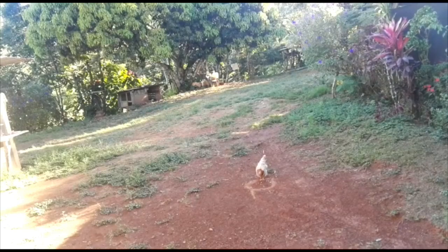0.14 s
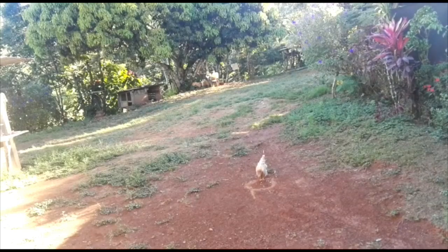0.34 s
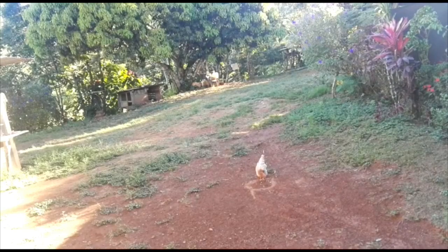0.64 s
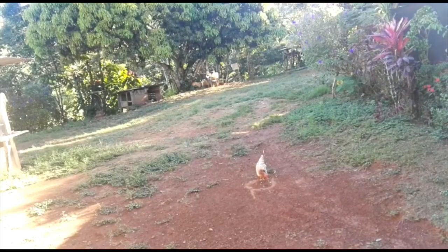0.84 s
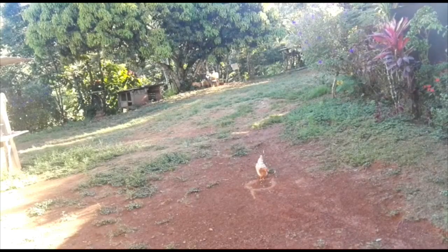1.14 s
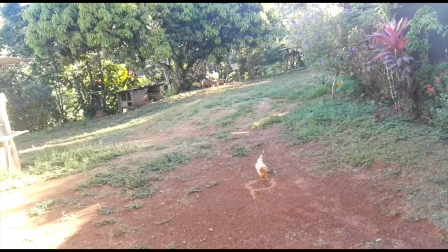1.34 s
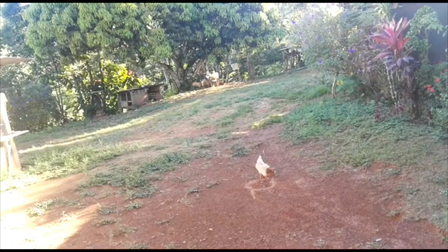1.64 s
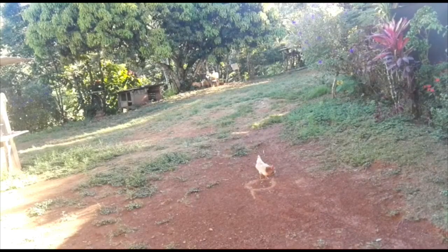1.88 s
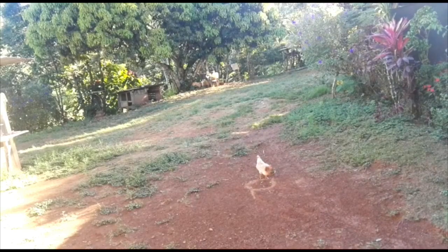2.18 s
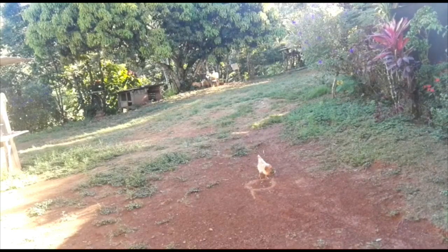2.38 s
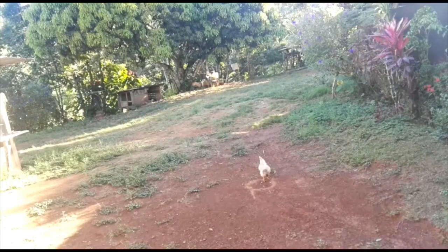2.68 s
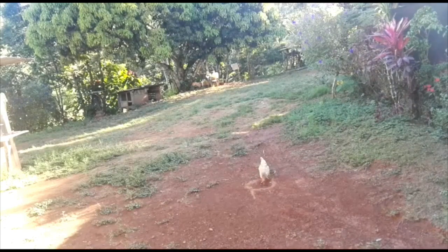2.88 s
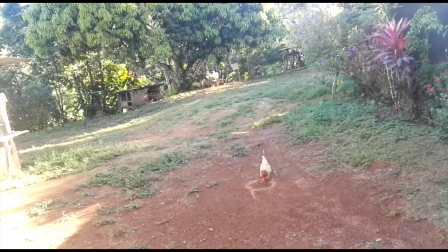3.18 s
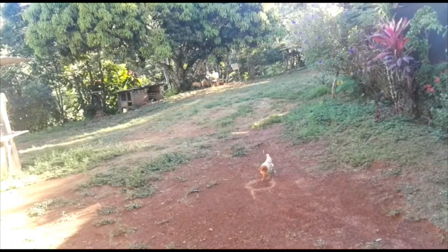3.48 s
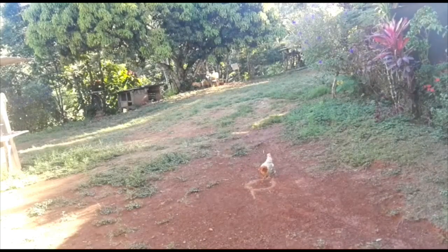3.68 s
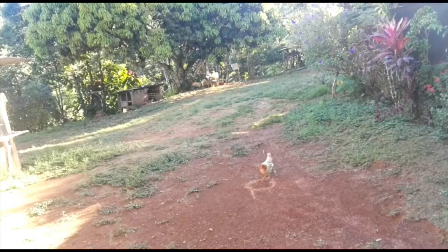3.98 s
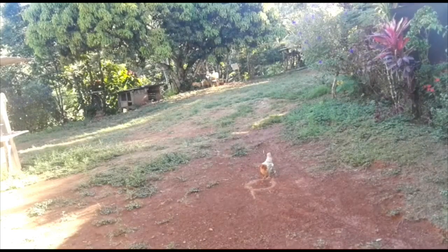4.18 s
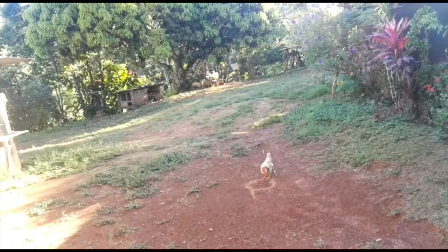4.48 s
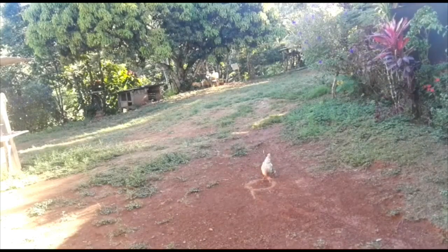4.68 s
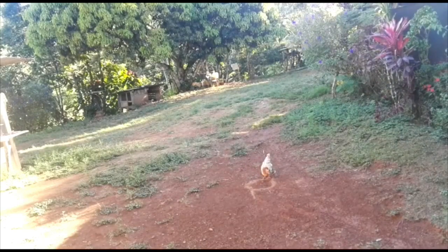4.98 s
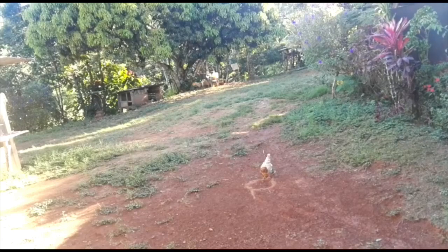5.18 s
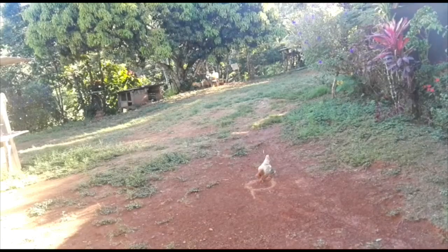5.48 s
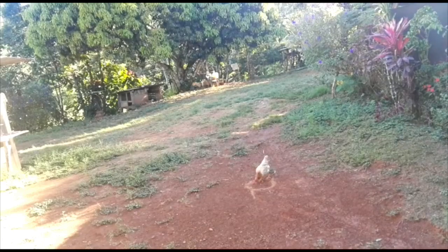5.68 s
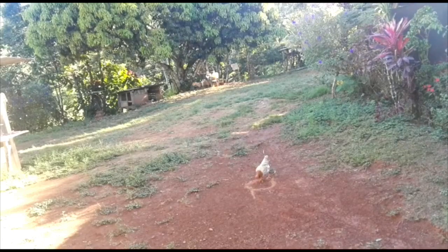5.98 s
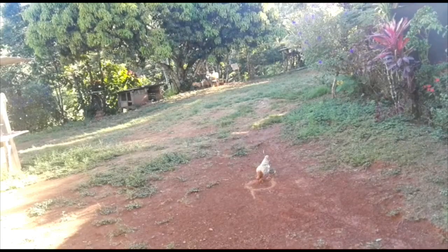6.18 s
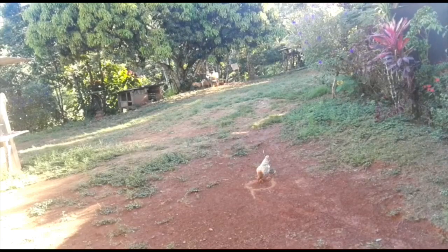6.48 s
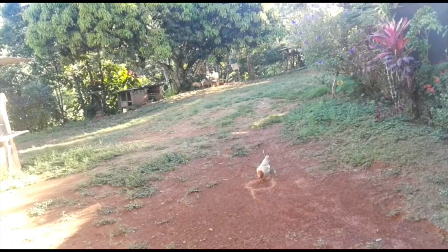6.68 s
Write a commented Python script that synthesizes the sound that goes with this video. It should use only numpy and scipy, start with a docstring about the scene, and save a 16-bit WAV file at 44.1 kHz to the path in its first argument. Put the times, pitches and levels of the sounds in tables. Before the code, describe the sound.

A quiet open yard with soft airy background and a thin, throbbing cicada shimmer, very high and slightly left. Tiny dry rustles come at the start. From about 0.55 to 1.4 s a chicken on the right gives a drawn-out squawk: a rough croak opening, a clear nasal tone slightly sinking in pitch, then a pulsing, creaky rasp. A short diffuse echo follows. Between calls a faint low wavering hum swells around 1.9 to 3.2 s; a second hen on the left clucks weakly near 2.0 and 2.3 s, then more plainly at 3.35 and 3.6 s, amid dull soft thumps. A far bird whistles downward near 2.7 s. From 4.3 to 5.05 s the first chicken repeats its long call, rasping at both ends. The distant whistle returns around 5.4 to 5.8 s, and a short gruff squawk comes at 5.85 s. Faint katydid ticks recur; insects and air continue to nearly 7 s.

```python
"""An open yard: a fowl to the right gives two drawn-out calls, clear in the middle and rasping at the ends,
then a short squawk. Pulses ringing a throat make the rasp, harmonic sines the clear voice.
A second hen clucks on the left in hoarse harmonic notes, and a far bird whistles in gliding sines.
Cicadas, a katydid, rustles, thumps and air are filtered noise; a low hum is wavering sines.
Decaying noise convolved with the birds gives the yard's echo."""
import sys
import numpy as np
from scipy import signal
from scipy.fft import rfft, irfft
from scipy.io import wavfile
from scipy.ndimage import uniform_filter1d

SR = 44100
rng = np.random.default_rng(int(sys.argv[2]) if len(sys.argv) > 2 else 0)


def gain_from_db(level_db):
    """Convert decibel levels to linear amplitude factors (20 dB per decade)."""
    decades = np.asarray(level_db, float) / 20
    return 10 ** decades


def waveform_to_disk(signal):
    """Save audio, clipped to [-1, 1], as 16-bit WAV at the path in sys.argv[1]."""
    frames = np.transpose(np.atleast_2d(signal))
    scaled = np.clip(frames, -1, 1) * 32767
    samples = np.round(scaled).astype(np.int16)
    wavfile.write(sys.argv[1], SR, samples)


N = 301644

PORT_LAG_S = 0.00061   # lag of the left port behind the right


def rms_one(x):
    """Normalisation to unit root-mean-square."""
    return x / np.sqrt(np.mean(x ** 2) + 1e-20)


def in_time(rows, t):
    """Linear interpolation in time: the columns of a table after its first, read at times t."""
    s, *columns = np.transpose(rows)
    return [np.interp(t, s, c) for c in columns]


def at_hz(points, hz):
    """Spectral interpolation: a level curve read on a log-frequency axis."""
    curve = np.array(points)
    return np.interp(np.log(hz), np.log(curve[:, 0]), curve[:, 1])


def add(out, x, s):
    """Superposition: mixes x into out from time s on."""
    i = max(round(s * SR), 0)
    out[..., i:i + x.shape[-1]] += x[..., :N - i]


def late(x, s):
    """Propagation delay of s seconds."""
    return np.interp(np.arange(N) - s * SR, np.arange(N), x, left=0)


def band(x, low_hz, high_hz, order=2):
    """Band-pass filtering."""
    return signal.sosfilt(signal.butter(order, [low_hz, high_hz], "band", fs=SR, output="sos"), x)


def drift(rate, count=N):
    """Random modulation of spread 1: chance knots, twice the rate per second, joined by straight lines."""
    knots = rng.standard_normal(int(count * 2 * rate / SR) + 3)
    steps = np.arange(count) * 2 * rate / SR
    return np.interp(steps, np.arange(len(knots)), knots) * np.sqrt(3 / 2)


def air(level_db=-67.5, patchy_db=.5):
    """Partial coherence: far wind and leaves are coloured noise, alike at both ports in the bass."""
    # Each row: frequency in Hz, spectral level in dB before the whole is scaled.
    colour = [(30, -12), (55, -10), (180, -13.5), (440, -14.5), (560, -13.5), (1400, -14), (2600, -19.5),
              (4350, -25.5), (6000, -30), (8200, -31.5), (10500, -29.5), (13500, -29.5)]
    # Each row: frequency in Hz, left-right likeness from 0 to 1.
    likeness = [(60, .998), (300, 0.98), (700, 0.11), (1500, .3), (4000, 0.11)]
    # Each row: frequency in Hz, left minus right in dB.
    balance = [(300, -0.5), (1500, -4.5), (8000, 2.5)]
    hz = np.fft.rfftfreq(N, 1 / SR) + 1
    shared, left, right = rfft(rng.standard_normal((3, N))) * gain_from_db(at_hz(colour, hz))
    sides = gain_from_db(np.outer([.5, -.5], at_hz(balance, hz)))
    alike = np.clip(at_hz(likeness, hz), 0, 1)
    own = np.sqrt(1 - alike) * np.array([left, right])
    lag = np.exp(-2j * np.pi * np.outer([PORT_LAG_S, 0], hz))   # the shared part comes later on the left
    out = irfft(sides * (own + np.sqrt(alike) * shared * lag), N)
    return gain_from_db(level_db + patchy_db * drift(2.015)) * rms_one(out)


def cicadas(throb_hz=38.3, depth=0.19, flicker_db=0.5):
    """Amplitude modulation: noise in narrow body resonances throbs with the muscle beat."""
    # Each row: time in seconds, level of the lower singers in dB before the side balance,
    # higher singer above them in dB.
    singers = [(0.0, -61, -20), (0.05, -64.5, -4.5), (0.8, -64.5, -1.5), (1.14, -73, -7.5), (1.33, -65, -8),
               (1.62, -62, 2), (2.36, -61.5, -3), (2.57, -68.5, -14), (2.88, -59, -5), (3.26, -66, -3),
               (3.89, -61, -8), (4.17, -64.5, -5), (5.87, -62, -7), (5.96, -65, -10.5), (6.63, -63, -1.5),
               (6.84, -64, -5)]
    t, out = np.arange(N) / SR, 0
    low_db, above_db = in_time(singers, t)
    resonances = [(6669, 124, low_db - 1.5), (6748, 170, low_db - 2.5),
                  (7073, 94, low_db + above_db), (13320, 500, low_db - 25.0)]
    for hz, width, db in resonances:
        beat = 2 * np.pi * np.cumsum(throb_hz * (1 + 0.037 * drift(2.3))) / SR
        noise = band(rng.standard_normal((2, N)), hz - width / 2, hz + width / 2)
        noise[1] += 0.11 * noise[0]   # each port hears its own blend
        throb = 1 + depth * np.sin(beat) + depth * 0.24 * np.sin(2 * beat)
        out = out + gain_from_db(db + flicker_db * drift(4.5)) * rms_one(noise) * throb
    return out * gain_from_db([[4.5], [-1.5]])   # left, right


def grainy_bursts(rows):
    """Shaped noise: grainy bands that swell to a peak at half their time scale, stronger on the left."""
    out, t = np.zeros((2, N)), np.arange(int(.4 * SR)) / SR
    for s, db, low_hz, high_hz, time_scale in rows:
        grains = rng.standard_normal((2, len(t))) * gain_from_db(2.0 * drift(150, len(t)))
        noise = band(grains, low_hz, high_hz)
        swell = t / time_scale * np.exp(2 - 2 * t / time_scale)
        add(out, gain_from_db(db) * rms_one(noise) * swell * gain_from_db([[3.0], [-3.0]]), s)
    return out


def rustles():
    """Friction noise: dry rustles near by, each a band of grainy noise."""
    # Each row: start in seconds, level in dB before envelope and side balance, lowest Hz, highest Hz,
    # time scale of the envelope in seconds.
    rustle_rows = [(.01, -64.5, 2900, 6000, 0.047), (.32, -65.5, 7500, 14700, 0.045),
                   (1.14, -79, 8770, 9600, 0.15), (2.258, -67, 2510, 4230, 0.042)]
    return grainy_bursts(rustle_rows)


def rasp(jitter=.3, spread_db=5.5, fourth_db=-12):
    """Source and filter: slow pulses ring the throat; rough ones come unevenly, drawn out into a puff of air."""
    # One table a call. Each row: time in seconds, mean pulses per second, level in dB,
    # beak brightness as 3rd resonance above the 1st in dB, roughness from 0 to 1.
    calls = [
        [(.555, 92.4, -63.5, -23.5, 0.38), (.6, 65, -36.5, -18, 0.69), (.65, 75, -27, -7.5, 0.75),
         (.72, 81.7, -46.5, -1.5, 0.86), (.93, 94, -57, 4.5, 0.99), (1.01, 98.4, -33, -6.5, 0.65),
         (1.1, 87.8, -35.5, 0, 0.26), (1.17, 92, -37.5, -3, .35), (1.24, 91, -36, -2.5, 0.18),
         (1.3, 93.5, -28.5, -7.5, 0.04), (1.38, 80, -34.5, -4.5, .12), (1.41, 82, -40, 1, 0.37)],
        [(4.295, 89, -68.5, -20, .7), (4.34, 63.7, -35.5, -17.5, 0.71), (4.39, 70.7, -28.5, -5.5, 0.59),
         (4.44, 76.7, -26, -13, 0.61), (4.49, 72.6, -34.5, -2.5, 0.82), (4.56, 83, -48.5, 2, .8),
         (4.7, 90, -52.5, -0.5, .9), (4.93, 94, -63, -1, 0.92), (4.99, 89.5, -37, -7.5, .6),
         (5.04, 80, -46.5, 4, .6)],
        [(5.8, 95, -70, -18.5, 0.97), (5.84, 74.3, -51.5, -21, .8), (5.865, 64.7, -40.5, -15.5, .7),
         (5.9, 78, -36, -6, .55), (5.94, 72.7, -40.5, -5.5, 0.48), (5.97, 69, -59, 4, 0.63)],
    ]
    # Throat resonances. Each row: frequency in Hz before the pitch ratio, width in Hz,
    # share of the throat's movement (exponent of the ratio).
    throat = [(585, 95, 1), (980, 250, 1), (1680, 150, .45), (2060, 240, .45)]
    # Every call opens alike. Each row: seconds after the start, throat pitch ratio before tension.
    opening = [(0, .64), (.025, 0.793), (.05, .92), (.09, 1.057), (.13, 1.1), (.19, 1.007), (.45, 0.945),
               (.75, 1.012)]
    # Throat pitch ratio of each call as a whole.
    tensions = [1.0, 1, 0.93]
    out, t = np.zeros(N), np.arange(1600) / SR
    for call, tension in zip(calls, tensions):
        s, pulses = call[0][0], np.zeros(N)
        while s < call[-1][0]:
            rate, db, third_db, rough = in_time(call, s)
            ratio = tension * in_time(opening, s - call[0][0])[0]
            second_db = 4 + .37 * third_db   # the 2nd resonance shares part of the beak's brightness
            rough = np.clip(rough, 0, 1)
            puff = rng.standard_normal(900) * np.exp(-t[:900] * rate / (1.1 + rough))
            push = np.sqrt(rough) * rms_one(puff) / np.sqrt(len(puff))
            push[0] = np.sqrt(1 - rough)
            ring = 0
            levels_db = (0, second_db, third_db, third_db + fourth_db)
            for (hz, width, share), level_db in zip(throat, levels_db):
                # every resonance swells before it dies, which keeps the valleys between them dark
                swell = t * np.exp(-np.pi * width * t)
                tone = rms_one(swell * np.sin(2 * np.pi * hz * ratio ** share * t))
                ring = ring + gain_from_db(level_db + rough * spread_db * rng.standard_normal()) * tone
            # little is radiated below the first resonance, wherever it lies
            ring = band(ring, .75 * ratio * throat[0][0], 2400, order=4)
            add(pulses, signal.fftconvolve(push, ring) * np.sqrt(SR / rate / len(t)), s)
            s += (1 + jitter * rough * np.clip(rng.standard_normal(), -2, 2)) / rate
        time = np.arange(N) / SR
        dying_db = 600 * np.maximum(time - call[-1][0], 0)   # the last pulse is choked
        out += pulses * gain_from_db(in_time(call, time)[1] - dying_db)
    return out


def clear_voice(waver=0.002, fade_s=.03, fourth_gains=.35):
    """Harmonic series: sines on multiples of the pitch; the odd ones drop out when both swings grow alike."""
    # One table a stretch. Each row: time in seconds, mean pitch in Hz, level in dB before the harmonics' own,
    # odd harmonics in dB, brightness in dB per octave.
    stretches = [
        [(.68, 288.5, -30.5, -8, 1), (.715, 288, -30.5, 4.5, -4.5), (.78, 282.1, -30, -5.5, 4),
         (.885, 278.8, -34, -2.5, 0.5), (.905, 276.5, -30.5, -28.5, -3), (.96, 273, -32.5, -26, 3.5)],
        [(1.13, 276, -34.5, -18.5, -1.5), (1.19, 278.2, -35.5, -17, -2)],
        [(4.37, 293, -30.5, -12.5, -7.5), (4.42, 301.7, -37, -4, -19), (4.48, 294.9, -35, 2, -1.5),
         (4.54, 283.6, -29, -2, 3), (4.66, 283.3, -33, 1, 3.5), (4.72, 279.9, -31.5, 3.5, -2),
         (4.9, 279.1, -33, 4, -4), (4.96, 275.2, -32, -2, -1)],
    ]
    # Each row: harmonic number, own level in dB.
    overtones = [(1, -24), (2, -0.5), (3, 2), (4, -7), (5, -19), (6, -9.5), (7, -17), (8, -28.5),
                 (9, -41.5), (10, -39.5), (11, -44.5), (12, -42.5), (14, -40.5)]
    # Every other swing is shorter for a while. Each row: start in seconds, length in seconds,
    # greatest phase shift in radians.
    doubling = [(0.796, 0.06, 0.042), (4.54, 0.19, 0.08)]
    out = np.zeros(N)
    for call in stretches:
        t = np.arange(call[0][0] - fade_s, call[-1][0] + fade_s, 1 / SR)
        hz, db, odd_db, tilt_db = in_time(call, t)
        phase = 2 * np.pi * np.cumsum(hz * (1 + waver * drift(21.65, len(t)))) / SR
        shift = 0
        for s, length, most in doubling:
            shift = shift + most * np.abs(np.sin(np.pi * np.clip((t - s) / length, 0, 1))) ** .5
        phase = phase + shift * np.sin(phase / 2)
        tone = 0
        for k, own_db in overtones:
            k = round(k)
            lean = np.log2(min(k, 6) / 3) * (k > 1)
            # the 4th harmonic wins a share of what the odd ones lose
            odd_share = k % 2 - fourth_gains * (k == 4)
            level = db + own_db + odd_db * odd_share + tilt_db * lean
            tone = tone + gain_from_db(level) * np.sin(k * phase + rng.uniform(0, 2 * np.pi))
        fade = np.clip(np.minimum(t - t[0], t[-1] - t) / fade_s, 0, 1)
        add(out, np.sqrt(2) * tone * fade, t[0])
    return out


def beak_edge(clear, rough, pulsing=.8, steady=.9, effort_db=-30):
    """Modulated turbulence: air hisses through the beak at each swing, taking on pitch, grain and effort."""
    # Each row: lowest Hz, highest Hz, level with the rasp in dB and with the clear voice in dB
    # (scaling the jet at effort_db, before the side balance), growth in dB per dB of effort.
    hiss_bands = [(2280, 4040, -70, -79, 1.5), (5270, 6500, -78, -75, 1.0), (9600, 15000, -92, -83.5, 1.5)]

    def running_size(x):
        """Short-time root-mean-square."""
        return np.sqrt(np.abs(uniform_filter1d(x ** 2, size=3000)) + 1e-9)

    voice = clear + rough
    size, clear_size, rough_size = running_size(voice), running_size(clear), running_size(rough)
    swing = np.maximum(voice / size, 0) ** 2
    # sharp closures of the clear voice put whole harmonics into the hiss
    closing = np.tanh(15 * clear / size - 5)
    air_jet = rng.standard_normal((2, N)) * (1 + pulsing * swing)
    singing, out = clear_size > gain_from_db(-45), 0
    for low_hz, high_hz, rasp_db, clear_db, growth in hiss_bands:
        jet = band(air_jet, low_hz, high_hz, order=4)
        edge = band(closing, low_hz, high_hz, order=4)
        rasp_part = gain_from_db(rasp_db) * (rough_size / gain_from_db(effort_db)) ** growth
        clear_part = gain_from_db(clear_db) * (clear_size / gain_from_db(effort_db)) ** growth
        effort = np.hypot(rasp_part, clear_part)
        out = out + effort * (rms_one(jet) + steady * edge / edge[singing].std())
    return out * gain_from_db([[2.0], [0.0]])   # left, right


def chest(voice, chest_db=-40):
    """Envelope following: the straining body adds a faint dull rumble that follows the effort."""
    effort = np.sqrt(uniform_filter1d(voice ** 2, size=1500) + 1e-12)
    return gain_from_db(chest_db) * effort * rms_one(band(rng.standard_normal(N), 190, 340))


def caller_at_ports(caller):
    """Delayed mixing: the right port hears the caller straight, the left one a blend of slightly delayed
    copies."""
    # Delayed copies heard at the left port. Each row: delay in seconds, level in dB.
    left_copies = [(.00007, -12), (.00066, -8), (.00238, -8)]
    left = sum(gain_from_db(db) * late(caller, s) for s, db in left_copies)
    return np.array([left, caller])


def yard(x, dull_hz=3500):
    """Reverberation: scattering from sheds and trunks dies fast; a faint dull return from the slopes lingers."""
    t = np.arange(int(1.6 * SR)) / SR
    near_db, near_t60 = -8.5, 0.34   # t60: seconds to fall by 60 dB
    far_db, far_t60, far_s = -43.5, 2.5, 0.33   # far_s: seconds of build-up
    clumps = gain_from_db(3 * drift(15, len(t)))
    near = rng.standard_normal((2, len(t))) * clumps * 1000 ** (-t / near_t60) * (t > .008)
    far = band(rng.standard_normal((2, len(t))), 480, 1750, order=1) * clumps * 1000 ** (-t / far_t60)
    far = far * np.clip(t / far_s, 0, 1) ** 2
    tail = (gain_from_db(near_db) * rms_one(near) + gain_from_db(far_db) * rms_one(far)) / np.sqrt(len(t))
    dull = signal.lfilter(*signal.butter(2, dull_hz, fs=SR), x)
    return signal.fftconvolve(dull[None], tail, axes=1)[:, :N]


def katydid():
    """Stridulation: each chirp is a short burst of grainy noise in a high band."""
    # Each row: start in seconds, level in dB before envelope and side balance.
    chirps = [(0.737, -69.5), (1.701, -76), (3.36, -78.5), (4.179, -76.5), (5.229, -77.5), (6.12, -79)]
    return grainy_bursts([(s, db, 8300, 9900, .06) for s, db in chirps])


def hum(roundness=0.31):
    """Frequency modulation: low tones waver in pitch as they swell and fade."""
    # Each row: start in seconds, length in seconds, mean frequency in Hz, mean level in dB before the swell.
    swells = [(1.849, .5, 123.4, -68.5), (1.858, 0.37, 216.3, -64.5), (2.199, 0.52, 209, -79.5),
              (2.24, .09, 434, -67.5), (2.354, 0.28, 125, -77), (2.739, 0.41, 215.2, -73.5),
              (2.77, 0.5, 125, -80), (2.9, .24, 463, -75)]
    out = np.zeros(N)
    for s, length, hz, db in swells:
        u = np.linspace(0, 1, int(length * SR))
        wavering = hz * (1 + 0.03025 * drift(2.28, len(u)))
        swell = np.abs(np.sin(np.pi * u)) ** roundness * gain_from_db(db + 3.6 * drift(24.59, len(u)))
        add(out, np.sqrt(2) * swell * np.sin(2 * np.pi * np.cumsum(wavering) / SR), s)
    return out


def clucks(waver=.025, attack_s=0.0074, sag_db_per_s=60):
    """Formant weighting: short hoarse harmonic notes take their levels from the throat's response."""
    # Each row: start in seconds, level in dB before sag and side balance, mean pitch in Hz,
    # length in seconds, brightness in dB per octave.
    notes = [(1.995, -54, 246.8, 0.069, -4.5), (2.269, -61.5, 236, 0.044, -5.5),
             (3.346, -48.5, 256.4, 0.069, -1.5), (3.613, -40.5, 269, 0.059, 4)]
    # Each row: frequency in Hz, throat response in dB before the note is scaled.
    response = [(240, -8), (500, -18.5), (780, 5), (1050, -3), (1350, 4.5), (1700, -6), (2200, -19.5)]
    out = np.zeros(N)
    for s, db, hz, length, tilt_db in notes:
        t = np.arange(0, length, 1 / SR)
        phase = 2 * np.pi * np.cumsum(hz * (1 + waver * drift(81, len(t)))) / SR
        note = 0
        for k in range(1, 9):
            level_db = at_hz(response, k * hz) + tilt_db * np.log2(k / 3) + 5.9 * drift(90, len(t))
            note = note + gain_from_db(level_db) * np.sin(k * phase)
        fade = np.clip(np.minimum(t, t[-1] - t) / attack_s, 0, 1)
        add(out, gain_from_db(db - sag_db_per_s * t) * rms_one(note) * fade, s)
    return out


def far_bird():
    """Frequency glide: whistles are single sines sliding from one pitch to another."""
    # Each row: start in seconds, length in seconds, first Hz, last Hz, peak level in dB.
    whistles = [(2.7, 0.1, 1740, 1620, -69), (2.77, 0.058, 1480, 1482, -68.5),
                (5.404, 0.063, 1600, 1571, -73), (5.443, 0.1393, 1490, 1430, -68),
                (5.697, 0.18, 1730, 1530, -71.5)]
    out = np.zeros(N)
    for s, length, first_hz, last_hz, db in whistles:
        u = np.linspace(0, 1, int(length * SR))
        hz = last_hz + (first_hz - last_hz) * (1 - u) ** 2
        add(out, gain_from_db(db) * np.sin(np.pi * u) ** .5 * np.sin(2 * np.pi * np.cumsum(hz) / SR), s)
    return out


def thumps():
    """Damped impulse: dull pushes of low noise die away exponentially, alike at both ports."""
    # Each row: start in seconds, level in dB before the decay, frequency in Hz about which the band lies.
    pushes = [(2.8, -62, 92.5), (2.899, -62.5, 150), (3.419, -60.5, 113), (3.64, -64.5, 98)]
    out, t = np.zeros((2, N)), np.arange(int(.4 * SR)) / SR
    for s, db, hz in pushes:
        noise = band(rng.standard_normal(len(t)), hz * 0.71, hz * 1.55)
        add(out, gain_from_db(db) * rms_one(noise) * np.exp(-t / 0.064), s)
    return out


def scene():
    """Superposition at two ports: caller on the right, second hen on the left, the rest around them."""
    clear, rough, hen, bird, low = clear_voice(), rasp(), clucks(), far_bird(), hum()
    caller = clear + rough
    near = caller_at_ports(caller) + beak_edge(clear, rough) + chest(caller)
    centre = np.array([late(bird + low, PORT_LAG_S), bird + low])
    second = np.array([gain_from_db(2) * hen, gain_from_db(-2) * late(hen, .0003)])
    insects = cicadas() + katydid()
    echo = yard(caller + hen + gain_from_db(8) * bird)   # the far bird excites the yard more strongly
    return near + second + centre + insects + rustles() + thumps() + air() + echo


def low_pass(x):
    """Removes everything above the highest recorded frequency."""
    return signal.sosfilt(signal.butter(12, 14410, fs=SR, output="sos"), x)


def record(dry):
    """Signal chain: the finished mix passes through a single last stage."""
    return low_pass(dry)


dry = scene()
out = record(dry)
waveform_to_disk(out)
```